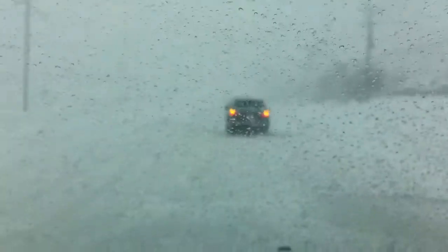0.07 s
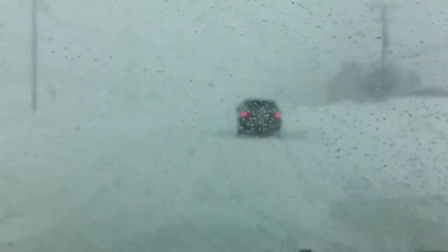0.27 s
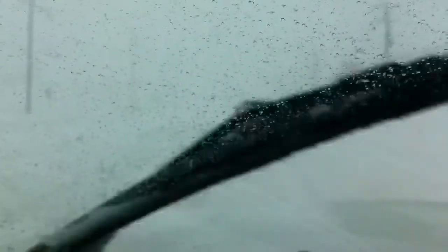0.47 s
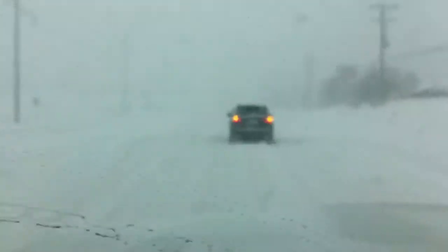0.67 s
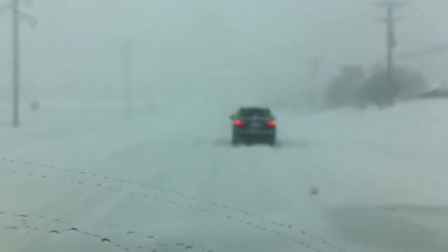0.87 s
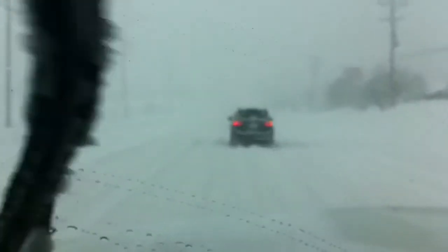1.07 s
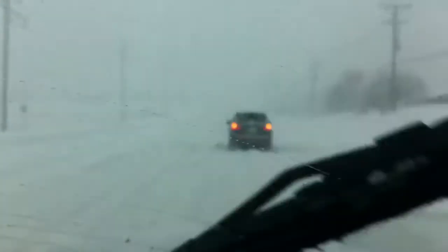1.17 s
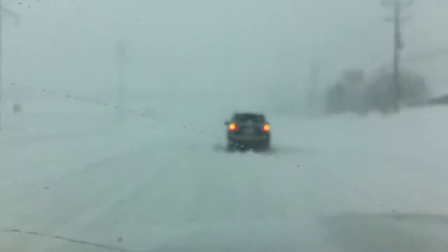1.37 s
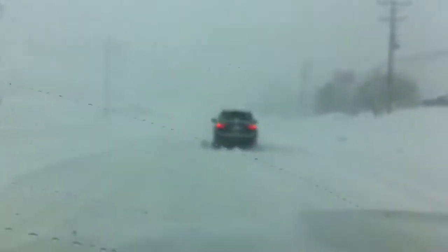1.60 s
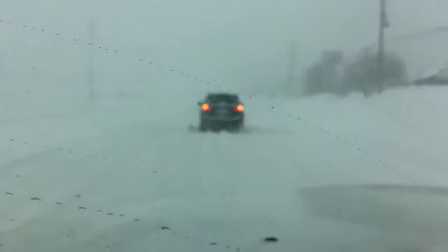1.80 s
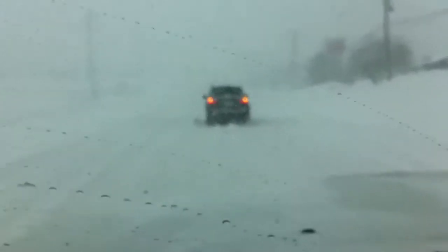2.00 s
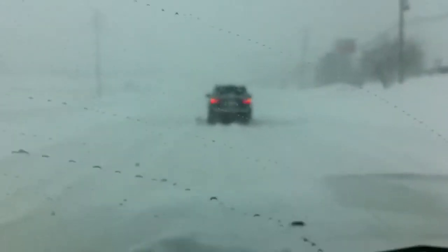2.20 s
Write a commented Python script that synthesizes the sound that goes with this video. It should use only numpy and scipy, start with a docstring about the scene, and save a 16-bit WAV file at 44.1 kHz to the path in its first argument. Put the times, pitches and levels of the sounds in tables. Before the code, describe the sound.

A windshield wiper rubs and thumps across wet glass over low car cabin rumble.

```python
"""Inside a car on a snowy road, the cabin rumbles from start to finish. First the wiper switch clicks.
Then the rubber blade judders and groans as it sticks and slips on the windshield, and the flasher
relay starts its steady tick-tock. The blade wipes on through wet grit and crumbs of ice, flips over
with a double thump just before the one-second mark, and finally sweeps back to rest."""
import sys
import numpy as np
from scipy import signal
from scipy.fft import rfft, irfft, next_fast_len
from scipy.io import wavfile
from scipy.ndimage import uniform_filter1d

SR = 44100
rng = np.random.default_rng(int(sys.argv[2]) if len(sys.argv) > 2 else 0)


def inscribe(sig):
    """Save sig as 16-bit PCM at rate SR to the path in sys.argv[1].

    A 1-D sig is mono; a 2-D sig holds one channel per row.
    Samples are clipped to [-1, 1] before scaling.
    """
    pcm = np.round(np.clip(np.atleast_2d(sig).T, -1, 1) * 32767)
    wavfile.write(sys.argv[1], SR, pcm.astype(np.int16))


N = 99225
T = np.arange(N) / SR


# How loudly the blade rubs (time [s], level [dB])
RUB_LEVEL = [(0, -70.5), (.29, -63), (.33, -49), (.43, -53.5), (.47, -58), (.68, -61), (.74, -54),
             (.82, -56.5), (.885, -47), (.94, -63.5), (.985, -62), (1.018, -51), (1.09, -59), (1.21, -57.5),
             (1.24, -52.5), (1.31, -62), (1.36, -56.5), (1.385, -49.5), (1.43, -62), (1.55, -52.5),
             (1.62, -70.5), (1.85, -70), (1.92, -59), (1.99, -75.5), (2.25, -69)]
# The rub's tone colour: how strong its lows and highs are (frequency [Hz], relative level [dB])
RUB_COLOUR = [(100, -52), (200, 4), (420, 7), (680, 0), (1000, -1.5), (1800, -8.5), (2800, -8.5),
              (4200, -13), (8000, -19), (16000, -64.5)]


def rub():
    """The rubber blade drags over grit on the glass."""
    return colour(level(RUB_LEVEL) * gritty_noise(per_s=1500, spread_db=2), RUB_COLOUR)


def squeaks(low_hz=1116, high_hz=3692, pitches=24, per_s=1100, width_hz=200):
    """Droplets and ice crumbs chirp under the rubber, growing and fading with the rub."""
    chirps = np.zeros(N)
    for hz in np.geomspace(low_hz, high_hz, pitches):
        kicks = grains(per_s / pitches, spread_db=5)
        chirps += resonate(resonate(kicks, hz, width_hz), hz, 2 * width_hz)
    return from_db(-7) * level(RUB_LEVEL) * rms_one(chirps)


# How loudly the water hisses (time [s], level [dB])
HISS_LEVEL = [(0, -74), (.29, -75), (.32, -62), (.39, -75), (.68, -68.5), (.72, -59), (.78, -66.5),
              (.885, -57.5), (.935, -83), (.985, -90), (1.02, -56), (1.09, -71), (1.16, -69), (1.17, -58),
              (1.185, -68), (1.32, -79), (1.44, -73), (1.54, -62.5), (1.61, -72), (1.86, -71),
              (1.93, -58.5), (1.99, -71), (2.25, -69)]
# The bright colour of the hiss (frequency [Hz], relative level [dB])
HISS_COLOUR = [(80, -52), (500, -37), (2000, -3.5), (4000, 4.5), (6500, 1), (9000, 0.5), (13000, -4),
               (14500, -2), (16000, -30)]


def water_hiss():
    """The blade pushes through a film of water and makes a fine spray."""
    return colour(level(HISS_LEVEL) * gritty_noise(per_s=3300, spread_db=2.5), HISS_COLOUR)


# Bursts of judder (start [s], length [s], strength [dB], slip rate [1/s], treble cut-off [Hz])
JUDDERS = [(0.311, .017, -36.5, 380, 1400), (.333, .013, -44, 360, 3000), (.346, 0.0072, -43, 400, 5000),
           (0.3742, 0.012, -36, 440, 5180), (.390, 0.011, -44.5, 450, 6000),
           (0.998, 0.0097, -48, 400, 1800), (1.379, 0.019, -50, 400, 2000), (1.539, 0.0098, -47, 380, 910)]
# Pitches at which blade and glass ring (frequency [Hz], width [Hz], relative level [dB])
BLADE_RINGS = [(512, 40, 3.5), (858, 96, -5.5), (940, 33, 1), (1030, 87, 0.5), (1196, 47, -2),
               (1331, 21, -2), (1470, 48, 1.5), (1760, 57, -2.5), (1980, 56, -3), (2260, 110, -5.5),
               (2370, 50, 0.5), (2636, 80, -3.5), (2770, 97, -4.5), (3110, 93, -8.5)]


def judder(edge_s=0.0056, jitter=0.2, spread_db=2.5):
    """The rubber sticks and slips unevenly; each slip makes blade and glass ring."""
    slips = np.zeros(N)
    for start, length, db, rate, cutoff_hz in JUDDERS:
        timing, size = rng.standard_normal((40, 2)).T
        times = start - edge_s + (np.arange(len(timing)) + jitter * timing) / rate
        knocks = np.zeros(N)
        knocks[(times * SR).astype(int)] = rms_one(from_db(spread_db * size)) * np.sqrt(SR / rate)
        slips += from_db(db) * gate(start, length, edge_s) * soften(knocks + 0.23 * noise(), cutoff_hz)
    tap = signal.unit_impulse(N)
    ring = sum((-1) ** k * from_db(db) * resonate(tap, hz, width)
               for k, (hz, width, db) in enumerate(BLADE_RINGS))
    return signal.fftconvolve(slips, ring / np.linalg.norm(ring))[:N]


# Groans of the rubber (start [s], length [s], level [dB], first pitch [Hz], last pitch [Hz])
GROANS = [(0.318, 0.03, -37, 345, 403), (0.351, 0.026, -45, 350, 395), (0.365, 0.044, -41.5, 422.4, 438),
          (0.454, 0.012, -38, 405, 388), (0.532, 0.0079, -37, 335, 336), (.540, 0.029, -41.5, 292, 289),
          (0.897, 0.017, -40, 512, 487), (1.385, .024, -51.5, 431, 415), (1.532, 0.019, -53, 563, 540)]


def groans(waver_depth=0.0593, overtone_db=-23):
    """The rubber lip vibrates in short, wavering low tones."""
    out = np.zeros(N)
    for start, length, db, first_hz, last_hz in GROANS:
        waver = 1 + waver_depth * rms_one(uniform_filter1d(noise(), size=150))
        pitch = np.interp(T, [start, start + length], [first_hz, last_hz]) * waver
        phase = 2 * np.pi * np.cumsum(pitch) / SR
        tone = rms_one(np.sin(phase) + from_db(overtone_db) * np.sin(2 * phase))
        out += from_db(db) * gate(start, length, edge_s=0.0064) * tone
    return out


# Blows on the glass (time [s], strength [dB], treble cut-off [Hz])
THUMPS = [(0.2494, -42, 1200), (0.8844, -36, 1800), (.887, -28, 600), (0.909, -39, 1800),
          (0.9141, -28.5, 495), (0.956, -42, 500), (0.986, -40, 407), (1.538, -61, 1200),
          (1.547, -56, 1800)]
# The windshield's own notes (frequency [Hz], relative level [dB], time to fade by 60 dB [s])
GLASS_NOTES = [(201, 0, 0.082), (264, -4, 0.082), (278, 2, .05), (339, -3, 0.049), (393, -9.5, 0.065),
               (525, -3, 0.035), (560, -34, 0.049), (765, -14.5, 0.042), (1073, -15, 0.047),
               (1200, -33, 0.033)]


def thumps(low_cut_hz=140):
    """Soft blows of arm and blade set the windshield ringing; the deep bass is cut away."""
    out = np.zeros(N)
    for start, db, cutoff_hz in THUMPS:
        first = int(start * SR)
        age = T[:N - first]
        ring = sum(from_db(note_db + rng.normal(0, 1) - 60 * age / fade) * np.sin(2 * np.pi * hz * age)
                   for hz, note_db, fade in GLASS_NOTES)
        out[first:] += from_db(db) * soften(ring, cutoff_hz)
    return signal.sosfilt(signal.butter(6, low_cut_hz, "high", fs=SR, output="sos"), out + 1e-18)


# How loudly the wiper drive drones (time [s], level [dB])
DRIVE_LEVEL = [(0, -86), (.23, -88), (.27, -43.5), (.42, -51), (.6, -56.5), (.82, -57), (.87, -35.5),
               (.92, -43), (.95, -46.5), (1.05, -43), (1.15, -51.5), (1.48, -56.5), (1.55, -48.5),
               (1.66, -53), (1.72, -58.5), (2.25, -58)]
# The deep colour of the drone (frequency [Hz], relative level [dB])
DRIVE_COLOUR = [(30, -37), (75, -49), (115, -3.5), (155, 11.5), (215, -4.5), (290, 3), (420, -11),
                (700, -30), (2000, -46.5)]


def wiper_drive():
    """The drive drones under the load of pushing the blade."""
    return colour(level(DRIVE_LEVEL) * noise(), DRIVE_COLOUR)


# Snags on ice (time [s], crackle level [dB], fade time [s], ring pitch [Hz], ring level [dB])
ICE_SNAGS = [(.4214, -53.5, 0.015, 2420, -53), (0.4937, -51, 0.0062, 2510, -52.5),
             (0.567, -58.5, 0.0047, 2300, -54), (.610, -56, .005, 2970, -54.5),
             (0.633, -46.5, 0.0037, 1780, -49), (0.8396, -38.5, 0.0045, 1820, -51),
             (0.8824, -46.5, 0.014, 1210, -52.5), (0.9568, -55, 0.008, 2936, -63),
             (1.0147, -46.5, 0.0042, 1780, -49.5), (1.1232, -47.5, 0.0057, 2960, -55),
             (1.1662, -57, 0.0046, 4530, -65), (1.183, -57.5, 0.0077, 1660, -51.5),
             (1.23, -49.5, 0.007, 2330, -52.5), (1.279, -51, 0.0051, 2380, -53.5)]
# The colour of their crackle (frequency [Hz], relative level [dB])
ICE_COLOUR = [(60, -45), (170, 16), (500, 6), (1000, 1), (1900, -14), (3200, -6.5), (4500, -4), (8000, -14),
              (16000, -23)]


def ice_ticks():
    """The blade ticks as it catches on crumbs of ice."""
    return clicks(ICE_SNAGS, ICE_COLOUR, ring_width_hz=350)


# Switch contacts (time [s], crackle level [dB], fade time [s], ring pitch [Hz], ring level [dB])
SWITCH_CONTACTS = [(.2368, -47, 0.0047, 2980, -54), (.2405, -46.5, 0.0051, 6530, -49.5),
                   (.247, -69, 0.0041, 1020, -43.5)]
# The colour of their crackle (frequency [Hz], relative level [dB])
SWITCH_COLOUR = [(500, 1), (2200, 3.5), (3600, 4), (4800, -1.5), (6300, 6), (7800, -7), (10000, -2),
                 (12600, -3), (16000, -13)]


def wiper_switch():
    """The switch snaps over in three quick contacts."""
    return clicks(SWITCH_CONTACTS, SWITCH_COLOUR, ring_width_hz=340)


# The colour of the relay closing (frequency [Hz], relative level [dB])
TICK_COLOUR = [(60, -47), (300, -14), (850, 12), (1400, -3.5), (2900, -9), (3550, -3.5), (4100, -8),
               (5200, -7), (5750, -1.5), (6500, -14), (7700, 2), (8500, -3.5), (9500, -9.5), (11000, -15),
               (16000, -21)]
# The colour of the relay opening (frequency [Hz], relative level [dB])
TOCK_COLOUR = [(60, -43), (300, -16.5), (850, 3), (1500, -12), (2300, -4.5), (3050, 1), (3650, -3.5),
               (4600, -13), (9000, -14.5), (10200, -13.5), (11800, -15), (12700, -7.5), (14200, -10),
               (16000, -25)]


def flasher(first_s=0.3092, period_s=0.684, closed_s=0.3412):
    """The relay, an electric switch behind the dashboard, ticks as it closes and tocks as it opens."""
    starts = np.arange(first_s, N / SR, period_s)
    closing = from_db(-49) * sum(burst(start, fade_s=0.0092) for start in starts)
    opening = from_db(-49.5) * sum(burst(start + closed_s, fade_s=0.0067) for start in starts)
    return colour(closing * noise(), TICK_COLOUR) + colour(opening * noise(), TOCK_COLOUR)


def echoes(x, fade_s=0.032, echo_db=-11.5):
    """Sound bounces off dashboard and windows and quickly dies away."""
    tail = noise() * from_db(-60 * T / fade_s) * (T > 0.002)
    return from_db(echo_db) * signal.fftconvolve(x, tail / np.linalg.norm(tail))[:N]


# The colour of road noise inside the car (frequency [Hz], relative level [dB])
ROAD_COLOUR = [(15, -65), (25, -33), (79, -30.5), (160, -9), (410, -19.5), (552, -20.5), (741, -29),
               (945, -26), (1710, -37.5), (1900, -34), (2230, -44), (3630, -56), (15500, -52)]
# Low pitches that hum steadily (frequency [Hz], half the width of each filter [Hz], level [dB])
LOW_HUMS = [(110, 8.5, -64.5), (162, 10.6, -59), (268.6, 59, -63.5)]


def cabin_rumble(road_db=-54):
    """Noise from tyres and road fills the cabin, with a steady hum at a few low pitches."""
    hums = np.zeros(N)
    for hz, half_width, db in LOW_HUMS:
        band = resonate(noise(), hz, 2 * half_width)
        hums += from_db(db) * rms_one(resonate(band, hz, 2 * half_width))
    return from_db(road_db) * colour(noise(), ROAD_COLOUR) + hums


def from_db(db):
    """Turn decibels into a number to multiply by."""
    return 10 ** (np.asarray(db) / 20)


def rms_one(x):
    """Scale a signal so that its average power is 1."""
    return x / np.sqrt(np.mean(x ** 2) + 1e-20)


def level(rows):
    """Join (time [s], level [dB]) points into a volume curve."""
    return from_db(np.interp(T, *np.transpose(rows)))


def colour(x, points):
    """Shape the lows and highs of x; white noise keeps its overall power."""
    size = 2 * next_fast_len(N)
    hz, db = np.transpose(points)
    bins = np.maximum(np.arange(size // 2 + 1) * SR / size, 1)
    gains = rms_one(from_db(np.interp(np.log(bins), np.log(hz), db)))
    # These steps make the filter ring after a click, never before it.
    cepstrum = irfft(np.log(gains))
    cepstrum[1:size // 2] *= 2
    cepstrum[size // 2 + 1:] = 0
    return irfft(rfft(x, size) * np.exp(rfft(cepstrum)))[:N]


def resonate(x, hz, width):
    """Make x ring at one pitch; a smaller width rings for longer."""
    r = np.exp(-np.pi * width / SR)
    feedback = [1, -2 * r * np.cos(2 * np.pi * hz / SR), r * r]
    return signal.lfilter(np.array([1, 0, -1]) * (1 - r * r) / 2, feedback, x + 1e-18)


def soften(x, cutoff_hz):
    """Gently turn down the treble."""
    return signal.sosfilt(signal.butter(1, cutoff_hz, fs=SR, output="sos"), x + 1e-18)


def noise():
    """White noise: a plain, even hiss."""
    return rng.standard_normal(N)


def grains(per_s, spread_db):
    """Tiny random clicks of uneven size."""
    sizes = from_db(spread_db * np.minimum(rng.exponential(1, N), 4))
    return rms_one((rng.random(N) < per_s / SR) * sizes * rng.choice([-1, 1], N))


def gritty_noise(per_s, spread_db, grain_share=0.69):
    """Tiny clicks blended with smooth hiss."""
    return np.sqrt(grain_share) * grains(per_s, spread_db) + np.sqrt(1 - grain_share) * noise()


def gate(start, length, edge_s):
    """A volume curve that softly rises, holds and falls."""
    rise = (1 + np.tanh(2 * (T - start) / edge_s)) / 2
    fall = (1 - np.tanh((T - start - length) / edge_s)) / 2
    return rise * fall


def burst(start, fade_s, rise_s=0.00086):
    """The volume curve of a click: a fast rise and a quick fall."""
    age = np.maximum(T - start, 0)
    return np.minimum(age / rise_s, 1) * np.exp(-(age / fade_s) ** 1.65 / 2)


def clicks(rows, crackle_colour, ring_width_hz):
    """Each click is a dying crackle plus a short ring of its own."""
    crackle_volume, rings = np.zeros((2, N))
    for start, db, fade_s, ring_hz, ring_db in rows:
        shape = burst(start, fade_s)
        crackle_volume += from_db(db) * shape
        ring = rms_one(shape * resonate(noise(), ring_hz, ring_width_hz))
        rings += from_db(ring_db) * ring * np.sqrt(np.mean(shape ** 2))
    return rings + colour(crackle_volume * grains(per_s=9000, spread_db=1), crackle_colour)


def scene():
    """Wiper, switch and flasher over the cabin's rumble, in one channel."""
    wiper = rub() + water_hiss() + squeaks() + wiper_drive() + judder() + ice_ticks()
    near = wiper + wiper_switch() + flasher()
    return (near + echoes(near) + groans() + thumps() + cabin_rumble())[None]


def record(dry):
    """Cut off the very highest treble steeply."""
    cutoff_hz = 15750
    return signal.sosfilt(signal.ellip(12, 0.1, 70, cutoff_hz, fs=SR, output="sos"), dry)


dry = scene()
out = record(dry)
inscribe(out)
```